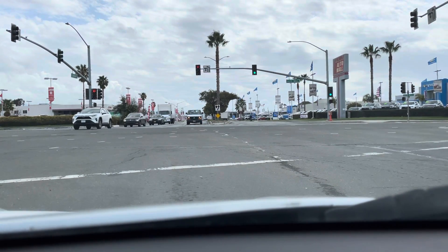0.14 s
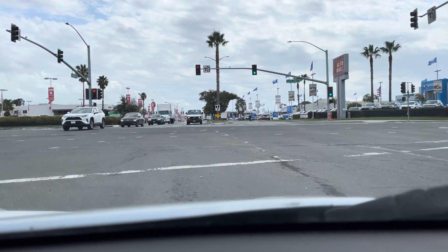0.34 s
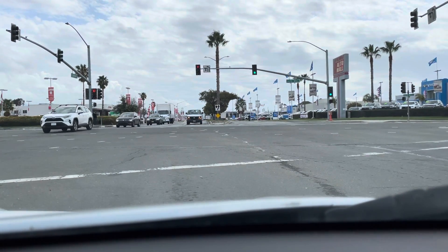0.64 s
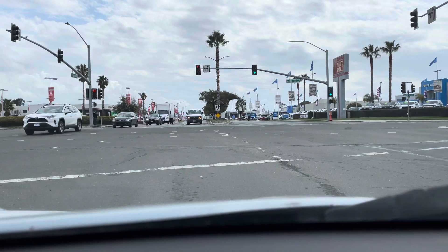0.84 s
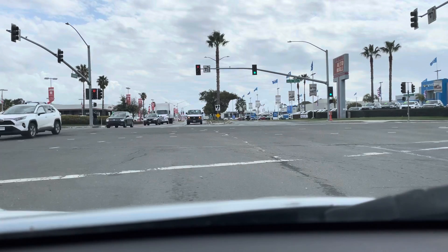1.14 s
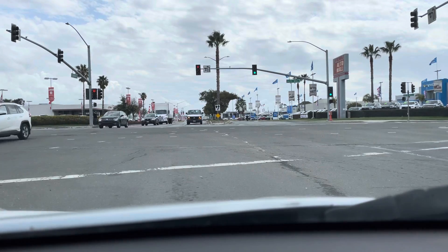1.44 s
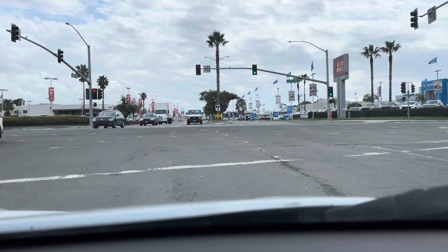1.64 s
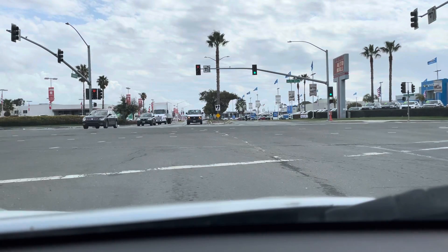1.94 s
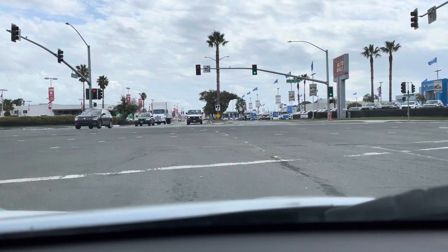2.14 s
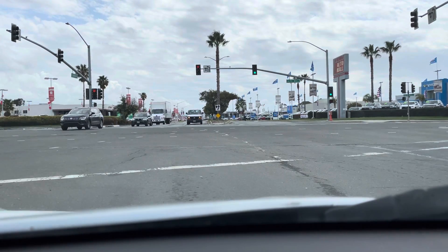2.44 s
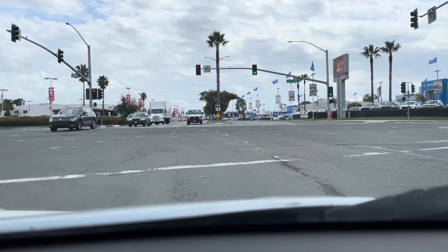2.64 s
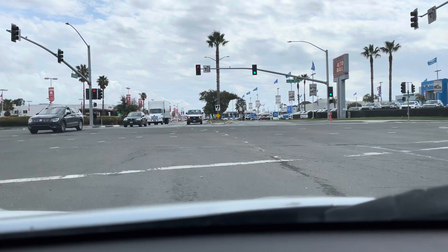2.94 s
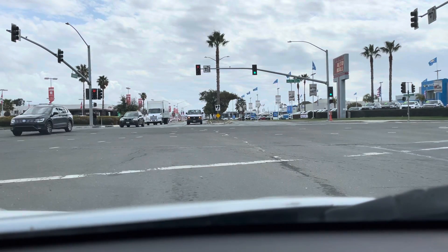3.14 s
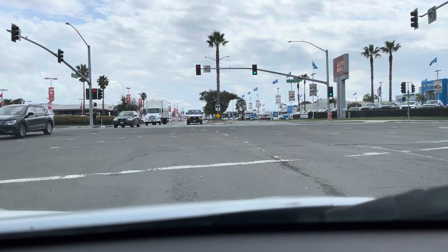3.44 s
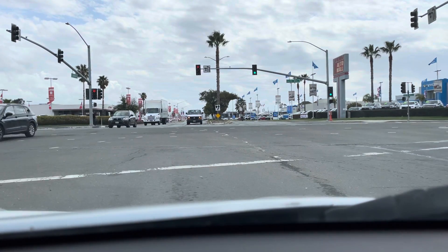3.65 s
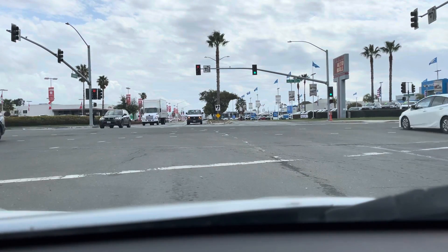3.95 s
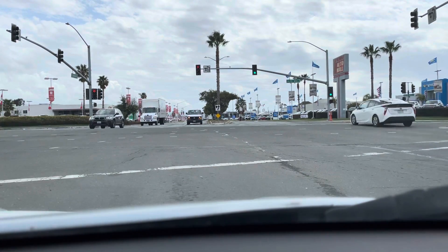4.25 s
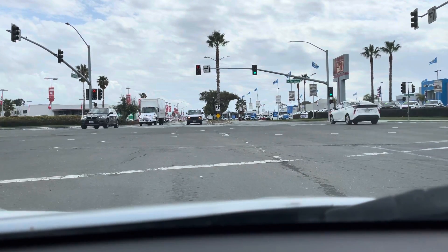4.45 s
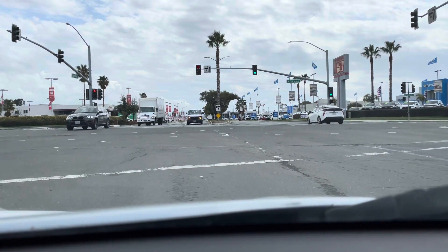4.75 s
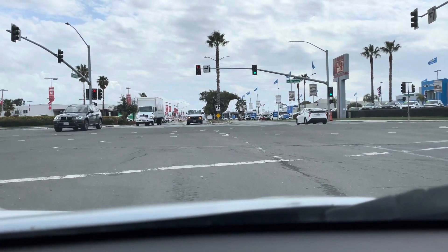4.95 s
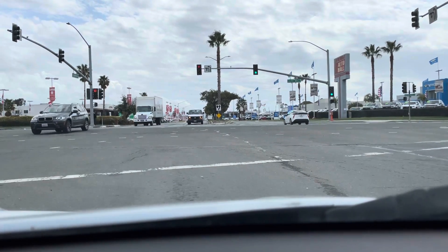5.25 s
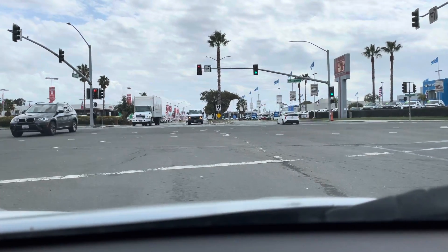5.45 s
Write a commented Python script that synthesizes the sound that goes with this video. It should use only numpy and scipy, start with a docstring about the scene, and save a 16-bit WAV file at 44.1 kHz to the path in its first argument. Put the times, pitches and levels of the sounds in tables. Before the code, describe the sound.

A car engine idles low and unevenly inside a closed cabin, then one throttle blip surges into a loud booming growl and begins to fall.

```python
"""Inside a closed car at a crossing, microphone on the dashboard: a four-cylinder engine idles unevenly, then
one blip of the throttle sweeps the firing tone up and down through the cabin boom. The engine is wavering
harmonics of the firing rate over noise that puffs with each firing. Traffic is a swelling noise wash through
the glass, pumps and fans are narrow whines, and pedal and trim tick as struck resonances."""
import sys
import numpy as np
from scipy import signal
from scipy.io import wavfile
from scipy.ndimage import uniform_filter1d

SR = 44100
rng = np.random.default_rng(int(sys.argv[2]) if len(sys.argv) > 2 else 0)


def pcm_store(signal):
    """Save signal as 16-bit PCM."""
    levels = np.round(np.clip(np.atleast_2d(signal), -1, 1) * 32767)
    wavfile.write(sys.argv[1], SR, levels.astype(np.int16).T)


N = 246078
T = np.arange(N) / SR

# the throttle blip: t/s, firing rate f/Hz, firing tone level/dB, body shudder level/dB, intake roar level/dB
BLIP = [(4.45, 25.2, -38, -13, -2.5), (4.516, 25.77, -28, -4, -2.5), (4.6, 31.26, -14.5, 2.5, 3),
        (4.66, 38.01, -14.5, 15.5, 8.5), (4.73, 46.84, -8.5, 14, 14), (4.78, 53.58, -10, 13, 7),
        (4.82, 60.2, -7.5, 14, 12.5), (4.86, 66.04, -9, 13.5, 11.5), (4.9, 69.42, -9.5, 7.5, 10.5),
        (4.94, 71.46, -7, 6, 8), (5.01, 74.7, -6, 1, 9), (5.126, 76.54, -4.5, -1.5, 9.5),
        (5.2, 75.18, -5.5, 1.5, 11), (5.284, 70.13, -8.5, 5, 7.5), (5.358, 66.6, -14.5, 14.5, 10.5),
        (5.44, 60.8, -11, 11, 4.5), (5.526, 56.43, -8.5, 10, 9.5), (5.58, 54.6, -11.5, 11.5, 13.5)]
# what the cabin passes of the blip's harmonics: f/Hz, level/dB
BOOM = [(40, 8), (75, 17), (95, 3.5), (112, 6), (130, 5), (148, -1.5), (165, -5.5), (180, -3.5), (198, -3),
        (213, -2.5), (226, 3.5), (245, -2.5), (265, 1), (283, -4), (302, 3), (325, -7.5), (380, -3),
        (410, -9.5), (480, 0)]
# swell of cars rolling past outside: t/s, level/dB
TYRES = [(0.0, 2), (0.17, 1.4), (0.68, 1.7), (1.88, 3), (2.46, 7.5), (3.02, 3), (3.5, 4), (4.1, 4),
         (4.6, 5.5)]
# drift of the treble at idle: t/s, level/dB
TREBLE = [(0.0, -2), (0.95, -2), (1.44, 3), (2.19, 1), (2.69, -3.5), (3.19, -4), (3.78, 0), (4.37, -4),
          (4.6, 2)]
IDLE_HZ = 25.104  # firing rate at idle
SHAKE_HZ = 7.7  # speed of the unsteadiness in the blip


def amp(db):
    """Decibels to gain."""
    return 10 ** (np.asarray(db) / 20)


def evened(x):
    """Scaled to rms 1."""
    return x / np.sqrt(np.mean(abs(x) ** 2) + 1e-20)


def colour(points, hz):
    """Gain of an (f/Hz, level/dB) table at hz; silent outside it."""
    f, db = np.transpose(points)
    return amp(np.interp(np.log(hz + 1), np.log(f + 1), db, left=-120, right=-120))


def curves(rows):
    """Each column of a table after its time, sample by sample."""
    s, *columns = np.transpose(rows)
    return [np.interp(T, s, c) for c in columns]


def wander(hz):
    """Complex chance of rms 1 that changes at about hz."""
    step_s = 100 / SR
    z = rng.standard_normal((N // 100 + 2, 2)) @ [1, 1j]
    smoothing = np.exp(-(np.fft.fftfreq(len(z), step_s) / hz) ** 2)
    z = np.fft.ifft(np.fft.fft(z) * smoothing)
    return np.interp(T, np.arange(len(z)) * step_s, evened(z))


def resonate(x, hz, width):
    """Shifts hz down to zero, smooths, and shifts back: a resonance of gain 1."""
    turn = np.exp(2j * np.pi * hz * np.arange(len(x)) / SR)
    r = np.exp(-np.pi * width / SR)
    return 2 * (turn * signal.lfilter([1 - r], [1, -r], x / turn)).real


def stereo(mid, side):
    """Left and right from common part and contrast."""
    return np.array([mid + side, mid - side])


def throttle():
    """0 at idle, 1 once the pedal is down."""
    return np.clip((T - 4.51) / 0.23, 0, 1)


def firing_turns():
    """Firings counted since the start."""
    return np.cumsum(np.where(T < BLIP[0][0], IDLE_HZ, curves(BLIP)[0])) / SR


def firing_tone():
    """The fundamental, one cycle per firing: weak and unsteady at idle, steady at full throttle."""
    idle_db = -36
    hz, blip_db, *_ = curves(BLIP)
    gain = amp(np.where(T < BLIP[0][0], idle_db, blip_db))
    unsteady = 1 + 0.5 * (1 - throttle()) * wander(3.6)
    return [(hz, gain * unsteady * np.exp(2j * np.pi * firing_turns()))]


def idle_harmonics():
    """Uneven firing makes harmonics 2, 3 and 4 lope, throb, waver and slip in time."""
    # harmonics 2 to 4: level/dB, steady share [0-1], waver f/Hz, throb once in four firings [0-1],
    # share of the hum's swell, swing of timing with the lope [firings], lag of that swing t/s
    harmonics = [(-17, 0.92, 9.8, 0.05, 1.05, -.02, .01), (-20.5, 0.86, 9.3, 0.2, 0.022, -0.041, -.1),
                 (-22, 0.44, 11.8, 0.12, 0.018, -.03, -.05)]
    # the cabin cancels itself between the harmonics: f/Hz, level/dB
    nulls = [(5, -2), (30, 2), (37, 5), (44, 4), (50, 0), (56, -1.5), (61, -8), (67, -11.5), (71, 1),
             (75, 0), (81, 1), (86, -8), (92, 1.5), (100, 0), (108, -2), (116, -2.5), (400, -1.5)]
    # swell and dips of the idle hum, used about their mean: t/s, level/dB
    hum_levels = [(0.0, -17), (0.36, -17), (0.4, -19.5), (0.63, -15.5), (0.73, -24), (0.81, -15),
                  (0.96, -22), (1.01, -32), (1.11, -14.5), (1.25, -17.5), (1.29, -27.5), (1.37, -13.5),
                  (1.45, -13.5), (1.49, -25.5), (1.55, -14), (1.62, -23), (1.7, -12), (1.79, -15.5),
                  (1.84, -30), (1.87, -21), (2.0, -16), (2.23, -15), (2.28, -28.5), (2.32, -18.5),
                  (2.53, -16), (2.61, -29), (2.68, -13), (2.88, -22), (2.91, -28.5), (2.98, -13),
                  (3.21, -20), (3.35, -14.5), (3.5, -26), (3.55, -15.5), (3.68, -14.5), (3.76, -30.5),
                  (3.86, -14), (4.01, -20.5), (4.09, -12.5), (4.2, -15.5), (4.29, -25), (4.36, -14),
                  (4.44, -20), (4.5, -13.5)]
    lope_hz = IDLE_HZ / 8  # once in eight firings
    lope_depth, lope_peak_s, throb_peak_s = 0.05, 0.329, 0.016
    slip, slip_hz = 0.056, 0.59  # slow slip of the firing moment [firings, Hz]
    hum_bend = 0.35  # how far the hum slips in time around each dip
    pipe_spread = 0.021  # the pipe delays each harmonic by this share of a firing times its number

    lope = np.exp(2j * np.pi * (T - lope_peak_s) * lope_hz)
    throbbing = np.cos(np.pi / 2 * IDLE_HZ * (T - throb_peak_s))
    hum_db = curves(hum_levels)[0]
    hum = signal.hilbert(np.log(amp(hum_db - np.mean(hum_db))))
    bent_hum = hum.real + 1j * hum_bend * hum.imag
    slipped = firing_turns() + slip * wander(slip_hz).real
    cabin = colour(nulls, abs(np.fft.fftfreq(N, 1 / SR)))
    hz = curves(BLIP)[0]
    tones = []
    for k, (db, steady, waver_hz, throb, swell, swing, lag) in enumerate(harmonics, 2):
        beat = 1 + lope_depth * lope.real + throb * throbbing
        waver = np.sqrt(steady) + np.sqrt(1 - steady) * wander(waver_hz)
        uneven = beat * np.exp(swell * bent_hum) * waver
        loping = swing * (lope * np.exp(-2j * np.pi * lag * lope_hz)).imag
        phase = k * (slipped + loping - pipe_spread * k)
        tone = (1 - throttle()) * amp(db) * uneven * np.exp(2j * np.pi * phase)
        tones += [(k * hz, np.fft.ifft(np.fft.fft(tone) * cabin))]
    return tones


def blip_harmonics():
    """Harmonics 2 to 6 swell through the cabin boom and shake more as the body shudders."""
    # harmonics 2 to 6: level/dB, share of the shudder they follow
    harmonics = [(-37, 0.92), (-25.5, 0.34), (-28.5, 0.69), (-38.5, 0.48), (-42, 0.7)]
    # their common strength: t/s, level/dB
    growl = [(4.6, -1), (4.66, 4.5), (4.72, -2), (4.8, -5), (4.86, -7), (4.95, -2.5), (5.0, -5.5),
             (5.05, 1), (5.16, 0.5), (5.21, -13), (5.28, -1), (5.35, 3.5), (5.4, 1), (5.45, 0), (5.5, -6.5),
             (5.58, 0)]
    shake, shake_per_db = 0.02, 0.02
    boom_lag = 0.12  # the firing tone trails these harmonics through the cabin boom [firings]

    hz, _, shudder_db, _ = curves(BLIP)
    turns = firing_turns()
    tones = []
    for k, (db, share) in enumerate(harmonics, 2):
        shaky = 1 + (shake * (k - 1) + shake_per_db * shudder_db) * wander(SHAKE_HZ)
        gain = throttle() * amp(db + share * shudder_db + curves(growl)[0]) * colour(BOOM, k * hz)
        phase = k * (turns + boom_lag) + (k - 1) / 4
        tones += [(k * hz, gain * shaky * np.exp(2j * np.pi * phase))]
    return tones


def half_orders():
    """Unequal cylinders sound between the harmonics in the blip."""
    # multiples of the firing rate
    orders = [1.5, 2.5, 3.5, 4.5]
    # strength of each multiple: level/dB
    order_levels = [-14.5, 2.5, -1.5, -5.5]
    # how unequally the cylinders fire: t/s, level/dB
    unequal = [(4.5, -27), (4.66, -28), (4.75, -25.5), (4.82, -24), (4.9, -14.5), (5.0, -33.5), (5.15, -47),
               (5.21, -19.5), (5.28, -21.5), (5.33, -30), (5.38, -21), (5.47, -31), (5.58, -37)]
    hz, turns = curves(BLIP)[0], firing_turns()
    tones = []
    for k, db in zip(orders, order_levels):
        shaky = 1 + 0.33 * wander(SHAKE_HZ)
        gain = throttle() * amp(db + curves(unequal)[0]) * colour(BOOM, k * hz) * shaky
        tones += [(k * hz, np.sqrt(0.5) * gain * np.exp(2j * np.pi * (k * turns + rng.random())))]
    return tones


def low_harmonics():
    """The lowest firing orders reach the two microphone ports; the idle hum hands over to the blip."""
    # contrast between the ports: f/Hz, level/dB
    lean = [(20, -25.5), (50, -29.5), (65, -14.5), (80, -26.0), (110, -8.5), (200, -15), (320, -5.0), (600, -4.0)]
    tones = firing_tone() + idle_harmonics() + blip_harmonics() + half_orders()
    mid = 1j * sum(tone for f, tone in tones)  # each firing is a push, then a pull
    side = 1j * sum(tone * colour(lean, f) for f, tone in tones)
    side = side * np.exp(1.2j)  # bass reaches one port a little earlier
    return np.sqrt(2) * stereo(mid.real, side.real)


def upper_harmonics(count=24):
    """Higher harmonics blur with uneven firing, the more the higher, and light up on the cabin resonances."""
    # what the cabin passes of them: f/Hz, level/dB
    cabin = [(110, -25.5), (150, -29.5), (180, -30.5), (215, -34), (245, -34.5), (290, -37.5), (320, -49.5),
             (400, -49), (600, -66)]
    base_db, open_db, shudder_share = -2.5, 17.5, 0.0065  # open_db: lift at open throttle
    turns = firing_turns()
    load_db = base_db + open_db * throttle() + shudder_share * curves(BLIP)[2]
    hz, mid, side = np.gradient(turns) * SR, 0, 0
    for k in range(5, count):
        tone = colour(cabin, k * hz) * np.exp(2j * np.pi * (k * turns + rng.random()))
        tone = tone * (1 - throttle() * (k < 7))  # the blip has its own harmonics 5 and 6
        mid = mid + tone * (0.31 + 1.183 * wander(2.21 * k))
        side = side + tone * np.clip(k * hz / 600, 0, 1) * wander(1.3 * k)
    return amp(load_db) * np.sqrt(2) * stereo(mid.real, side.real)


def level(base_db, open_db, shudder, intake, drift, drift_curve):
    """A layer follows throttle, shudder and intake roar by its shares, and drifts while the engine idles."""
    shudder_db, intake_db = curves(BLIP)[2:]
    lift_db = open_db * throttle() + shudder * shudder_db + intake * intake_db
    return base_db + lift_db + drift * (1 - throttle()) * curves(drift_curve)[0]


def wash(level_db, mid, rev, side, side_db, lean, twist, size, patchy_db, puff):
    """Coloured noise in drifting patches, puffing with each firing; lean and twist tie contrast to common part."""
    # puff of hiss at each of the four cylinders' firings: level/dB
    cylinders = [0.5, -2, -4.5, -1]
    frames, hz = 4 * N // size + 5, np.fft.rfftfreq(size, 1 / SR)
    a, b, c, d, patches = rng.standard_normal((frames, len(hz), 5)).T
    patches = uniform_filter1d(patches, size=size // 40, axis=0)
    patches = evened(uniform_filter1d(patches, size=6, axis=1))
    opened = np.interp(np.arange(frames) * size / 4 / SR, T, throttle())
    idle, revved = colour(mid, hz)[:, None], colour(rev, hz)[:, None]
    revved = revved * np.linalg.norm(idle) / np.linalg.norm(revved)  # same energy as at idle
    common = (a + 1j * b) * ((1 - opened) * idle + opened * revved)
    contrast = colour(side, hz)[:, None] * amp(side_db) * (c + 1j * d) + (lean + 1j * twist) * common
    spectra = np.array([common, contrast]) * amp(patchy_db * patches)
    m, s = signal.istft(spectra, nperseg=size, noverlap=3 * size // 4)[1][:, :N]
    turns = firing_turns()
    puffs = amp(np.take(cylinders, turns.astype(int) % 4)) * np.exp(-(turns % 1) / 0.63)
    gate = 1 + puff * uniform_filter1d(uniform_filter1d(puffs, size=150), size=150)
    return amp(level_db) * evened(gate) / np.std(m) * stereo(m, s)


def rumble():
    """The engine's deep noise in the cabin."""
    # base level/dB, lift at open throttle level/dB, shares of shudder, intake roar and idle drift
    loudness = (-24.5, -2.5, 0.7231, 0.1543, -0.6)
    # common part at idle, common part revved, contrast: f/Hz, level/dB
    mid, rev, side = [(8, -20.5), (16, -16.5), (25, -9), (33, 1), (39, 3), (45, 2.5), (56, -5), (64, -12.5),
                      (75, -6), (87, -9.5), (110, -3.5), (150, -0.5), (250, -5.5), (300, -21.5), (340, -39)], [(15, -40), (45, -4), (90, -13.5), (115, -2.5), (145, -11.5),
                                          (180, 1), (215, -5), (248, -0.5), (272, -12.5), (297, -2.5),
                                          (340, -42.5)], [(15, -53), (45, -17.5), (110, -13),
                                                              (200, -16.5), (300, -19), (340, -37.5)]
    return wash(level(*loudness, TYRES), mid, rev, side, side_db=-3.5, lean=0.04, twist=0.05,
                size=4096, patchy_db=0.5, puff=0.074)


def roar():
    """The engine's middle noise, following the intake roar."""
    # base level/dB, lift at open throttle level/dB, shares of shudder, intake roar and idle drift
    loudness = (-39, 0.57, 0.0155, 1.0263, 0.66)
    # common part at idle, common part revved, contrast: f/Hz, level/dB
    mid, rev, side = [(180, -34), (310, 2.5), (329, -8), (375, -2), (451, -1), (628, -3), (766, -12),
                      (895, -20), (1060, -26.5), (1150, -10.5), (1280, -14.5), (1800, -19), (2340, -56),
                      (3960, -120)], [(180, -29), (310, -15.5), (329, -9), (389, -4.5), (624, -11.5),
                                        (676, -17.5), (739, -10.5), (825, -23.5), (895, -12.5),
                                        (999, -21.5), (1190, -18), (1340, -27.5), (1800, -30),
                                        (2340, -63.5), (3960, -120)], [(180, -31.5), (310, 0.5), (435, 3), (468, -1),
                                                          (579, -0.5), (712, -0.5), (1090, -11), (1190, -7),
                                                          (1800, -21.5), (2340, -52.5), (3960, -120)]
    return wash(level(*loudness, TYRES), mid, rev, side, side_db=-2.0, lean=0.2, twist=0.29,
                size=1024, patchy_db=1.5, puff=0.099)


def hiss():
    """Treble noise that lifts with the throttle and puffs with the firings."""
    # base level/dB, lift at open throttle level/dB, shares of shudder, intake roar and idle drift
    loudness = (-53, 8, -0.0956, 0.1169, 0.32)
    # common part at idle, common part revved, contrast: f/Hz, level/dB
    mid, rev, side = [(1030, -13.5), (1750, -9.5), (1950, -2), (2000, -0.5), (2110, -4.5), (2160, -14),
                      (2320, -5), (2520, -9.5), (3350, -8.5), (5190, -14), (5630, -19.5), (6970, -17.5),
                      (7800, -34.5), (10100, -67), (17200, -120)], [(1030, -22.5), (1750, -3), (1930, -1), (2020, -1.5), (2580, -7),
                                        (3350, -3), (4580, -6.5), (5160, -7), (5630, -11.5), (6930, -12.5),
                                        (7800, -28), (10100, -66), (17200, -120)], [(1030, -30), (1750, 5), (1950, -6), (2110, -6.5),
                                                          (2160, -4.5), (3190, -3.5), (3680, -7),
                                                          (5230, -12), (5630, -13), (7800, -21),
                                                          (10100, -42.5), (17200, -120)]
    return wash(level(*loudness, TREBLE), mid, rev, side, side_db=-5.0, lean=0.25, twist=0.4,
                size=512, patchy_db=1.5, puff=0.13)


def sizzle():
    """The highest noise, with the strongest puffs and one colour throughout."""
    # base level/dB, lift at open throttle level/dB, shares of shudder, intake roar and idle drift
    loudness = (-66.5, 5.5, -0.15, 0.68, 0.6)
    # common part, contrast: f/Hz, level/dB
    mid, side = [(4470, -32), (7600, -1), (8280, -15), (8530, -23.5), (8630, -39.5), (9270, -33),
                 (9520, -13.5), (10300, -1.5), (13200, 3), (15400, -16)], [(4470, -29.5), (7600, -0.5), (8840, 1.5), (11700, -9.5), (12600, -18),
                                     (12900, -27.5), (13000, -64), (15400, -62.5)]
    return wash(level(*loudness, TREBLE), mid, mid, side, side_db=7.0, lean=0.01, twist=0.05,
                size=512, patchy_db=0.0, puff=0.6)


def ticks():
    """Pedal and trim: a sharp blow and a dying scrape of noise ring every trim mode with a set energy."""
    # t/s, thud level/dB, knock level/dB, tick level/dB, snap level/dB, t60/s
    blows = [(3.819, -35, -29, -38, -44.5, 0.043), (3.828, -38, -40, -45, -51.5, 0.074),
             (4.128, -32, -28, -31, -58, 0.065), (4.142, -15.5, -22, -38, -64, 0.046),
             (4.149, -24.5, -24.5, -37, -54, 0.04), (4.438, -40, -45, -46, -62.5, 0.053),
             (4.642, -26, -22, -34, -55, 0.067), (4.656, -23, -15.5, -32, -42, 0.041),
             (4.671, -29, -16.5, -34.5, -47, 0.096), (4.69, -20, -11, -23.5, -52, 0.03),
             (4.706, -31, -31, -29, -33.5, 0.033), (4.714, -26, -18.5, -26, -38, 0.044),
             (4.738, -21, -23, -34, -54, 0.033), (4.76, -37, -35, -47, -35, 0.048),
             (4.771, -37, -31, -38, -34, 0.035), (4.809, -18, -24, -36, -47, 0.04),
             (4.841, -16.5, -25, -35, -51, 0.049), (5.315, -31, -24, -44, -53, 0.03),
             (5.564, -25, -21, -50, -54, 0.042)]
    # trim modes in groups for thud, knock, tick and snap: f/Hz, width f/Hz, common level/dB, contrast level/dB
    trim = ([(378, 44, 5, -3), (437, 66, 1.5, -5)], [(557, 58, 2.5, -5), (686, 86, 3.5, -0.5),
            (727, 52, -2, -5), (850, 82, -3, -0.5)], [(1130, 66, 0.5, -3), (1410, 220, -7.5, -3.5),
            (1696, 93, -2, -2.5), (1890, 150, -3, -5.5), (2260, 130, -3, -9.5), (2830, 220, -4.5, -7),
            (3480, 79, -10, -8), (4170, 400, -10.5, -11)], [(5220, 390, 3, 0.5), (6000, 340, -2, -7.5),
            (6950, 510, 0, 2.5), (8800, 1800, -32, 3), (11200, 3700, -1.5, -13)])
    blow_share = 0.79  # the sharp blow against the scrape
    out, t = np.zeros((2, N + 5000)), np.arange(5000) / SR
    for s, *levels_db, t60 in blows:
        shape = amp(-60 * t / t60) * np.sin(np.pi / 2 * np.minimum(t / 0.0041, 1)) ** 2
        blow = blow_share * np.linalg.norm(shape) * (np.arange(len(t)) == 40)
        bursts = blow + shape * rng.standard_normal((2, len(t)))
        for part, burst in enumerate(bursts):  # common part, then contrast
            for db, modes in zip(levels_db, trim):
                ring = sum(amp(g[part]) * evened(resonate(resonate(burst, f, w), f, w)) for f, w, *g in modes)
                strength = amp(db) * np.sqrt(np.mean(shape ** 2)) * 0.58
                out[part, round(s * SR):][:len(t)] += strength * ring
    return stereo(*out[:, :N])


def rising_whine():
    """A faint fuzzy tone that climbs after the engine in the blip."""
    # t/s, f/Hz, level/dB
    climb = [(4.82, 4680, -72), (4.87, 4720, -54), (4.93, 4800, -55), (4.98, 5000, -54), (5.02, 5100, -55),
             (5.09, 5250, -54), (5.17, 5280, -68)]
    hz, db = curves(climb)
    fuzzy = (0.92 + 0.5 * wander(40)) * np.exp(2j * np.pi * np.cumsum(hz) / SR)
    rising = amp(db) * throttle() * fuzzy.real
    return stereo(rising, 0.4 * rising)


def whines():
    """Pumps and fans that ignore the throttle: narrow noise bands, some with a steady tone, all wavering."""
    # centre of each whine: f/Hz
    centres = [885, 2064, 2268, 2633, 3241, 5308, 6055]
    # width f/Hz, level/dB, left minus right level/dB, steady share [0-1], share of the waver
    bands = [(25, -52, 3, 0.01, 0.27), (36, -58, 1.5, .2, 0.9), (50, -64.5, 3, 0.3, .3),
             (30, -71, -3, 0, .3), (80, -67, 4, 0.2, .6), (130, -67, 6.5, 0, .3), (50, -73.5, -0.5, .1, .3)]
    # their common waver: t/s, level/dB
    swell = [(0, 3), (.5, 6), (.78, -2), (1.1, 3.5), (1.25, 4.5), (1.52, 6.5), (1.65, 2), (1.82, 8),
             (2.2, -0.5), (2.5, 3), (2.85, 0.5), (3.5, 6), (3.7, -2), (4.2, 1), (4.5, 3), (4.75, 4.5),
             (5.05, 7), (5.3, 9), (5.58, 2)]
    out = np.zeros((2, N))
    for hz, (width, db, pan_db, steady, waver) in zip(centres, bands):
        carrier = np.exp(2j * np.pi * hz * T)
        tone = ((np.sqrt(steady) + np.sqrt(1 - steady) * wander(width)) * carrier).real
        other = (wander(width) * carrier).real
        pan = amp([[pan_db / 2], [-pan_db / 2]])
        out += amp(db + waver * curves(swell)[0]) * pan * stereo(tone, 0.72 * other)
    return out


def tyres():
    """Traffic through the glass: a swelling noise wash, faded out as the engine revs and drowns it."""
    # common part, contrast: f/Hz, level/dB
    mid, side = [(500, -29.5), (750, -6.5), (900, 1), (1000, -1), (1130, -2), (1300, -20), (1800, -26.5)], [(400, -30.5), (700, -1.5), (1150, -7.5), (1800, -25.5)]
    outside = wash(-48.5 + curves(TYRES)[0], mid, mid, side, side_db=6.5, lean=0.2, twist=0.3,
                   size=1024, patchy_db=2.0, puff=0)
    return outside * (1 - throttle())


def scene():
    """Engine tones and noise, ticks, whines and the traffic outside."""
    engine = low_harmonics() + upper_harmonics() + rumble() + roar() + hiss() + sizzle()
    return engine + ticks() + rising_whine() + whines() + tyres()


def record(dry):
    """Quick fades at both ends; the converter rounds off the highest peaks; then the band limit."""
    fade_s, edge_hz = 0.004, 15600
    fade = np.minimum(np.minimum(T, T[::-1]) / fade_s, 1)
    rounded = fade * dry / (1 + abs(dry / 0.95) ** 8) ** (1 / 8)
    padded = np.pad(rounded, ((0, 0), (255, 255)), "reflect", reflect_type="odd")
    band_limit = signal.firwin(511, edge_hz, window=("kaiser", 9), fs=SR)
    return signal.oaconvolve(padded, band_limit[None], "valid", axes=1)


dry = scene()
out = record(dry)
pcm_store(out)
```